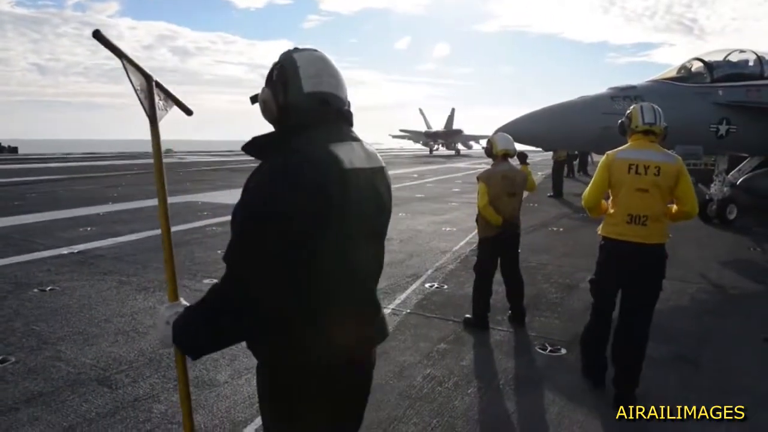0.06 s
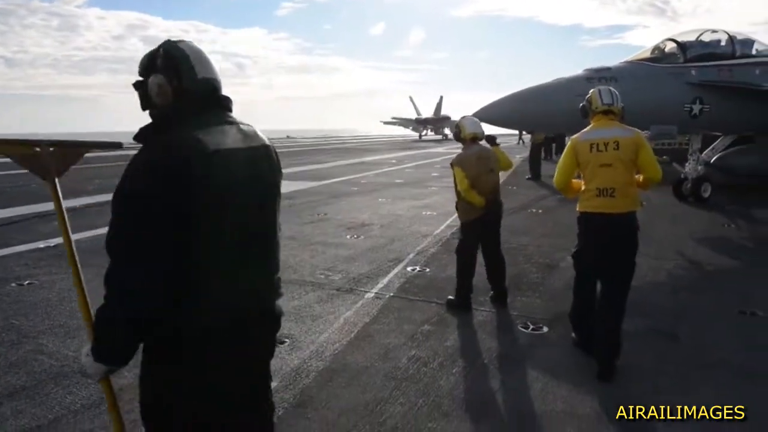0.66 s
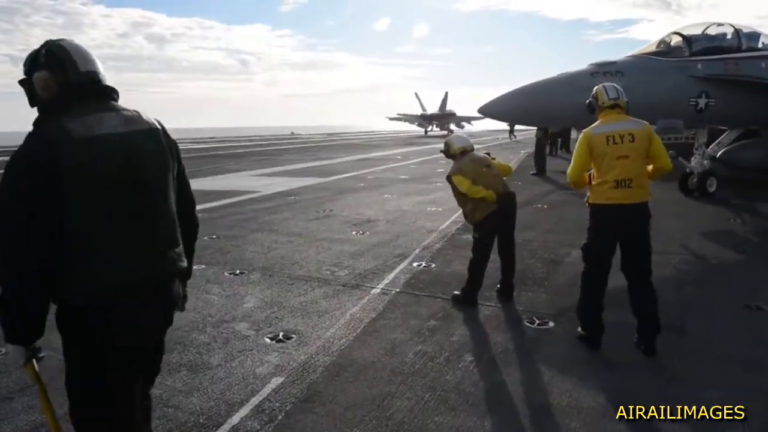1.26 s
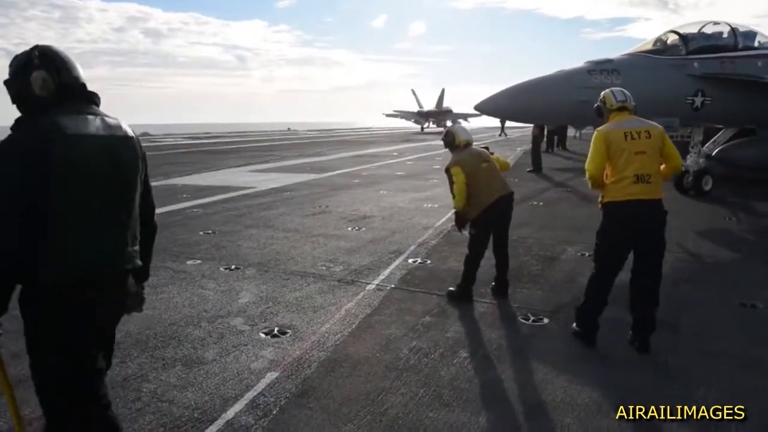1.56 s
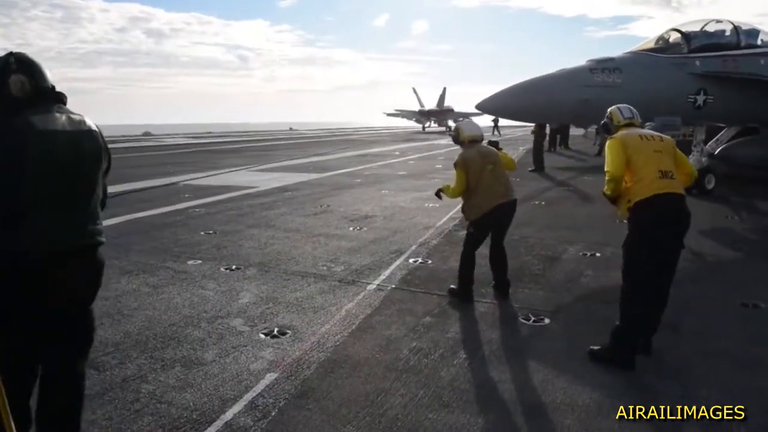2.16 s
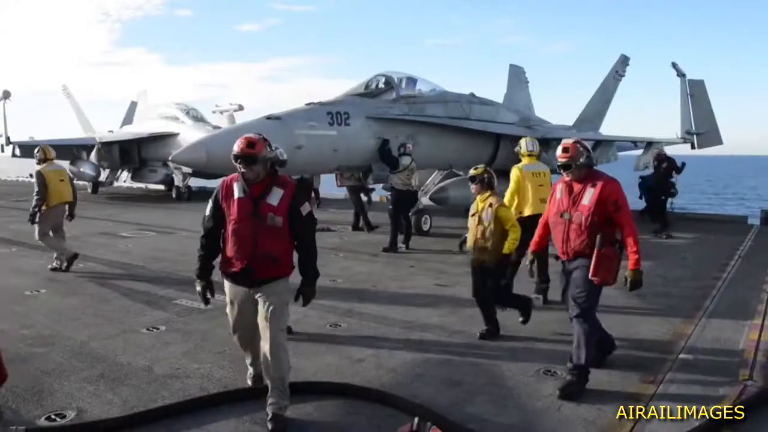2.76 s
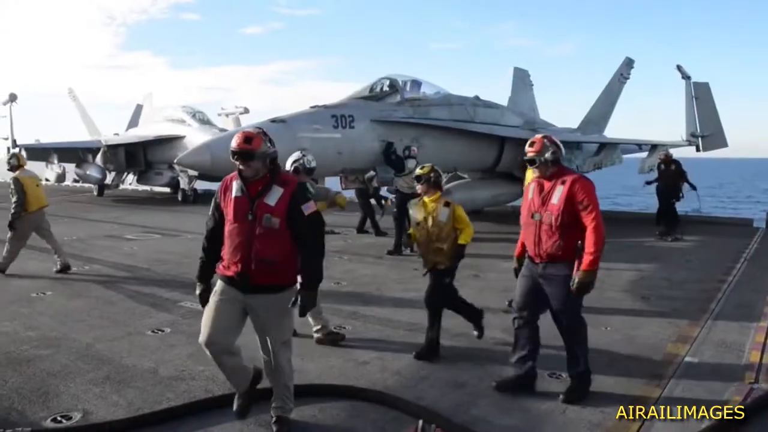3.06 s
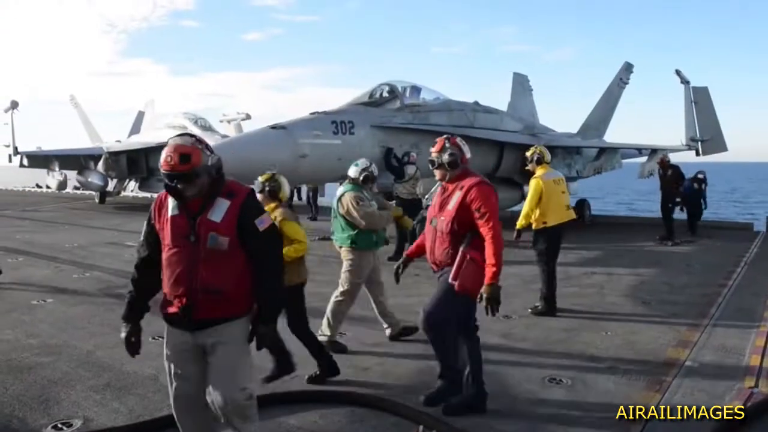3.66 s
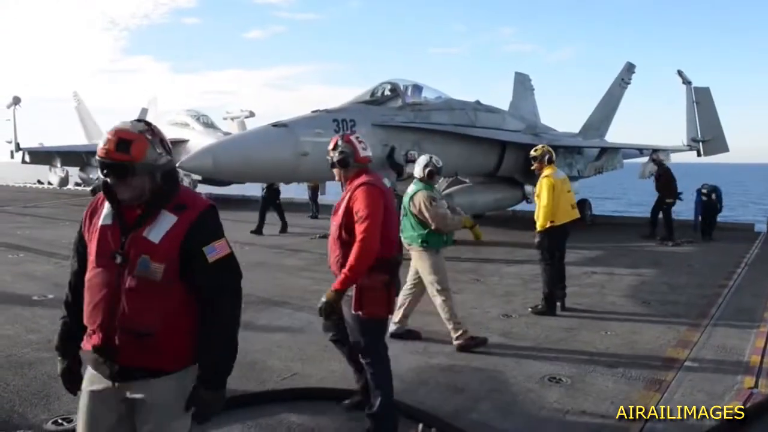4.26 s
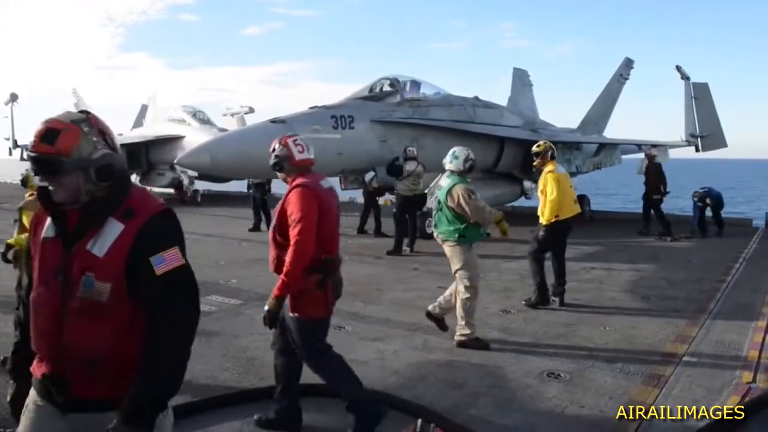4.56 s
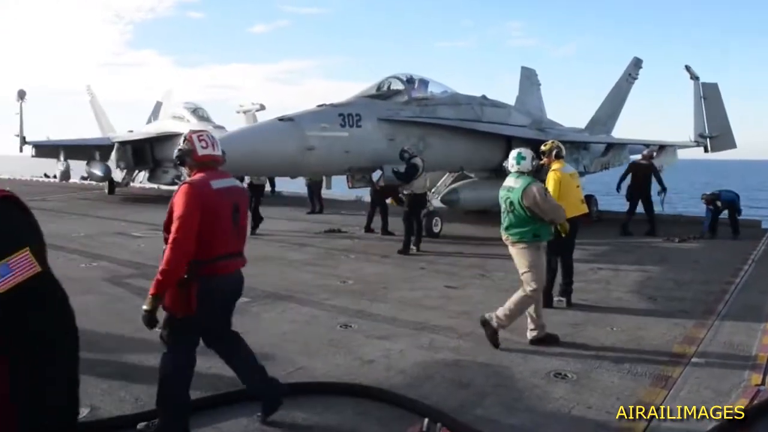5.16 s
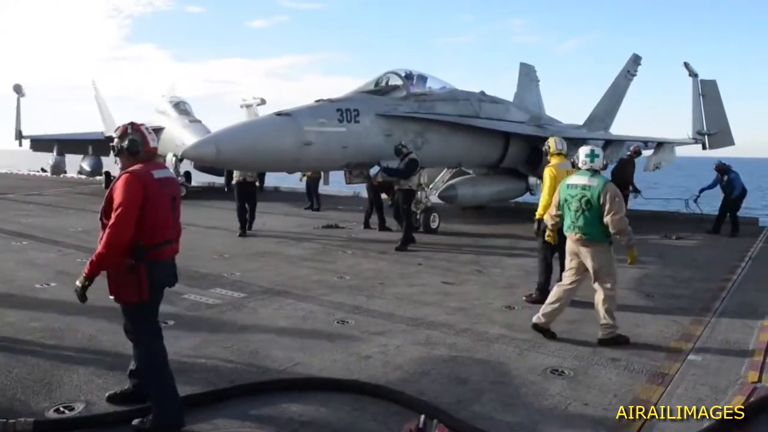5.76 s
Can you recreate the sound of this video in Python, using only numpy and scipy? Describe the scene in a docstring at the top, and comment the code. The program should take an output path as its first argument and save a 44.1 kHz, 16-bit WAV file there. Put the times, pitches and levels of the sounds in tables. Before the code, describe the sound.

A jet at full power roars on an open aircraft carrier deck, with a surging low rumble and a tearing crackle that overload the microphone. It starts to fade as the jet moves off. Then the sound switches abruptly to parked jets idling nearby, much quieter: a steady rush and airy hiss with thin, wavering high whines and a faint low drone.

```python
"""A jet at full power roars and crackles on a carrier deck, overloads the microphone, then moves off.
Swirling exhaust makes the rumble and roar; shock waves in it make the crackle.
Then the scene switches abruptly to parked jets idling nearby: spinning compressor blades whine
over the hiss of air being sucked in and a low exhaust drone."""
import sys
import numpy as np
from scipy import signal
from scipy.fft import rfft, irfft
from scipy.io import wavfile
from scipy.ndimage import uniform_filter1d

SR = 44100
rng = np.random.default_rng(int(sys.argv[2]) if len(sys.argv) > 2 else 0)


def inscribe(sig):
    """Save sig as 16-bit PCM at rate SR to the path in sys.argv[1].

    A 1-D sig is mono; a 2-D sig holds one channel per row.
    Samples are clipped to [-1, 1] before scaling.
    """
    pcm = np.round(np.clip(np.atleast_2d(sig).T, -1, 1) * 32767)
    wavfile.write(sys.argv[1], SR, pcm.astype(np.int16))


N = 261072
TIME = np.arange(N) / SR
FREQ = np.arange(N // 2 + 1) * SR / N


def undb(db):
    """Turn decibels into a gain."""
    return 10 ** (np.asarray(db) / 20)


def unit(x):
    """Scale to an average power of 1."""
    return x / np.sqrt(np.mean(x ** 2))


def steady(x, span_s):
    """Even out loudness over span_s; faster flutter stays."""
    power = uniform_filter1d(x ** 2, int(span_s * SR))
    return unit(x / np.sqrt(power + 1e-9))


def curves(table):
    """Join a table's timed points with lines, one curve per column."""
    times, *columns = np.transpose(table)
    return [np.interp(TIME, times, column) for column in columns]


def hump(peak_s, length_s):
    """A smooth rise to 1 and back, above half height for length_s."""
    return .5 ** ((2 * (TIME - peak_s) / length_s) ** 2)


def swells(table):
    """Add up humps into a level change in dB."""
    return sum(db * hump(s, length_s) for s, length_s, db in table)


def gone(lag_s=0):
    """How far the jet has moved off, from 0 towards 1."""
    leaves_s, fade_s = 2.18, .23
    return 1 - np.exp(-np.maximum(TIME - leaves_s - lag_s, 0) / fade_s)


def colour(x, outline):
    """Make each pitch louder or softer, following (pitch_hz, level_db) points."""
    hz, db = np.transpose(outline)
    return irfft(rfft(x) * undb(np.interp(np.log(FREQ + 1), np.log(hz), db)), N)


def wander(rate_hz):
    """A smooth random curve that changes about rate_hz times a second."""
    return unit(irfft(rfft(rng.standard_normal(N)) / (1 + (FREQ / rate_hz) ** 2), N))


def turbulence(outline, flicker_db, rate_hz):
    """Swirling air: noise in which each octave flickers on its own."""
    spectrum, out = rfft(colour(rng.standard_normal(N), outline)), 0
    octave = np.clip(np.log2((FREQ + 1) / 50), 0, 8)
    for k in range(9):
        band = irfft(spectrum * np.maximum(1 - np.abs(octave - k), 0), N)
        out = out + band * undb(flicker_db * wander(rate_hz))
    return unit(out)


def tone(hz, width_hz, clean=0.):
    """A tone blurred by hot air; clean is the share that stays pure."""
    scattered = (wander(width_hz / 2) + 1j * wander(width_hz / 2)) / np.sqrt(2)
    strength = np.sqrt(clean) + np.sqrt(1 - clean) * scattered
    phase = 2 * np.pi * np.cumsum(hz * np.ones(N)) / SR
    return unit(np.real(strength * np.exp(1j * phase)))


def whine(hz, width_hz, clean=0.):
    """A wavering blade tone with a breathy edge, scattered by swirling air."""
    wavering_hz = hz + 10 * wander(12.4)
    core = steady(tone(wavering_hz, width_hz, clean), span_s=.06)
    breath = tone(wavering_hz, width_hz=300) * undb(-4.5)
    return unit(core + breath) * undb(1.2 * wander(14))


def deck_echo(x):
    """The deck reflects the sound, hollowing it; the delay grows as the jet moves."""
    lag_s = (1.738 + .089 * TIME) / 1000
    return unit(x + undb(-17.5) * np.interp(TIME - lag_s, TIME, x))


def idle_exhaust(rush_db):
    """Idling exhaust rushes and wafts over a low drone and one soft thump."""
    # tone colour of the rush and the wafts: pitch_hz, level_db
    rush_colour = [(25, -34), (60, -14), (110, -11.5), (250, 0), (370, -4), (480, -2), (600, 0.5),
                   (900, 0.5), (1400, -1.5), (2000, -3), (2800, -2), (4000, -3.5), (8000, -13)]
    waft_colour = [(350, -25), (700, -7), (900, -1), (1400, -7.5), (3000, -4.5), (5000, -16)]
    # wafts of exhaust: peak_s, length_s, level_db
    wafts = [(2.884, .1, -52), (3.08, .14, -51), (3.498, .4, -45.5), (5, .42, -45), (5.29, .17, -43),
             (5.829, 0.48, -38.5)]
    # swells and dips of the drone: peak_s, length_s, change_db
    drone_swells = [(2.87, .06, 3), (4.05, .1, 4), (4.75, .15, 5.5), (5.02, .08, 7), (5.33, .1, 3.5),
                    (5.85, .3, -3)]
    rush = turbulence(rush_colour, flicker_db=1, rate_hz=26) * undb(rush_db)
    waft_gain = sum(undb(db) * hump(s, length_s) for s, length_s, db in wafts)
    waft = turbulence(waft_colour, flicker_db=2.5, rate_hz=29) * waft_gain
    drone_db = -53 + swells(drone_swells) + .63 * wander(12)
    drone = steady(tone(164, width_hz=60), span_s=.17) * undb(drone_db)
    thump = tone(90, width_hz=50) * undb(-50) * hump(2.87, length_s=.076)
    return rush + waft + drone + thump


def intake_hiss(hiss_db):
    """Air sucked into the engines hisses, with faint blade tones in it."""
    # tone colour of the hiss: pitch_hz, level_db
    hiss_colour = [(2000, -10), (4000, -4.5), (4800, -1.5), (5300, 4), (5900, 2.5), (6300, 2), (7600, 1),
                   (8700, -2), (10000, -2), (11200, 3.5), (12300, -9), (13000, -48)]
    # blade tones: pitch_hz, width_hz, above_hiss_db
    blade_tones = [(1970, 30, -19.5), (2295, 35, -22), (4380, 54, -20), (5720, 82, -14), (7560, 110, -16.5),
                   (8250, 110, -15), (11400, 300, -11.5)]
    hiss = steady(turbulence(hiss_colour, flicker_db=2, rate_hz=17), span_s=.21)
    blades = sum(tone(hz, width_hz) * undb(db) for hz, width_hz, db in blade_tones)
    return (hiss + blades) * undb(hiss_db + .5 * wander(45))


def idle_whines(hiss_db):
    """Spinning blades sing two compressor tones, a fan tone and some brief whines."""
    # lower compressor tone: time_s, pitch_hz
    lower_pitch = [(2.61, 5315), (3.1, 5330), (3.6, 5318), (4.6, 5308), (5.9, 5305)]
    # wind swells and fades it: peak_s, length_s, change_db
    lower_swells = [(2.86, .08, 4), (3.07, .15, 4), (3.5, .16, 4), (3.85, 0.18, 4), (4.11, 0.086, 8),
                    (4.37, 0.082, 8), (4.51, .08, -10), (4.63, .08, 10), (4.83, 0.072, 7), (5.05, .2, -2),
                    (5.48, .1, -3), (5.62, 0.068, 7), (5.8, .24, 6)]
    # upper compressor tone: time_s, above_hiss_db
    upper_level = [(2.61, -9), (2.69, 1.5), (2.77, -14), (2.87, 0), (2.95, -11), (3.14, -4), (3.28, -11),
                   (3.53, -5), (3.72, -9), (3.82, -5.5), (4.36, -3), (4.5, -15), (4.58, -4), (4.8, -11),
                   (5.3, -6), (5.45, -8), (5.9, -8)]
    # a fan creeping up in speed and back: time_s, pitch_hz, level_db
    fan_tone = [(2.61, 2125, -45), (2.72, 2125, -49), (2.82, 2145, -55), (3.0, 2150, -46),
                (3.25, 2170, -46), (3.36, 2170, -54), (3.47, 2194, -41), (3.57, 2180, -54),
                (3.9, 2240, -48), (4.2, 2280, -54), (4.6, 2290, -52), (4.93, 2278, -49.5),
                (5.12, 2253, -51), (5.28, 2245, -47), (5.55, 2200, -55), (5.76, 2206, -43),
                (5.9, 2180, -46)]
    # breathy whines: peak_s, length_s, pitch_hz, glide_hz_per_s, width_hz, level_db
    brief_whines = [(3, .6, 4900, 1, 90, -54), (3.197, 0.54, 2500, 0.5, 110, -52),
                    (3.35, 0.3, 4330, 0.5, 200, -48), (4.95, 0.65, 6830, -450, 220, -46),
                    (5.05, 0.53, 5710, -450, 220, -45), (5.8, .2, 4320, 1, 130, -47),
                    (5.808, .2, 5350, 1.5, 200, -44), (5.795, .25, 6480, 1, 200, -47)]
    lower_hz, = curves(lower_pitch)
    upper_db, = curves(upper_level)
    fan_hz, fan_db = curves(fan_tone)
    lower = whine(lower_hz, width_hz=56, clean=.1) * undb(-46.3 + swells(lower_swells))
    upper = whine(6040, width_hz=56, clean=.1) * undb(hiss_db + upper_db)
    fan = whine(fan_hz, width_hz=66) * undb(fan_db)
    brief = sum(tone(hz + glide * (TIME - s), width_hz) * undb(db) * hump(s, length_s)
                for s, length_s, hz, glide, width_hz, db in brief_whines)
    return lower + upper + fan + brief


def turbine_whistle():
    """The departing jet's turbine fades in, whistling at multiples of its shaft tone."""
    # whistles: shaft_multiple, width_hz, level_db
    whistles = [(5, 110, -40.5), (6, 150, -48), (7, 190, -48)]
    shaft_hz, start_s, fade_s = 983, 1.6, .4
    fade_in = np.clip((TIME - start_s) / fade_s, 0, 1)
    return fade_in * sum(tone(k * shaft_hz, width_hz) * undb(db) for k, width_hz, db in whistles)


def jet_rumble():
    """Big swirls of exhaust rumble and fade late; the lowest bass lasts longest."""
    # tone colour of three low layers: pitch_hz, level_db
    bass_colour = [(25, -9), (60, 1.5), (90, -3), (150, -25)]
    deep_colour = [(25, -34), (60, -15), (100, -3.5), (135, 1.5), (165, 2.5), (250, -31)]
    rumble_colour = [(25, -36), (60, -27), (95, -13), (140, -6), (195, 4.5), (235, 2.5), (275, 6),
                     (315, -1), (450, -10), (900, -56)]
    # surges of the rumble and of the biggest swirls: peak_s, length_s, change_db
    surges = [(.1, 0.17, 5.5), (.41, 0.04, -9), (.49, 0.07, 5.5), (.68, .25, 5), (.93, 0.074, 5),
              (1.47, .08, -1), (1.92, 0.4, 5), (2.27, 0.065, 5.5), (2.41, .09, 2)]
    deep_surges = [(.22, 0.068, 6.5), (.46, .08, 7), (.66, .08, 8), (.96, 0.093, 10.5), (1.19, 0.093, 4),
                   (1.41, .14, 9.5), (1.67, 0.064, 6), (1.95, 0.18, 4.5)]
    rumble = steady(turbulence(rumble_colour, flicker_db=1.5, rate_hz=7.5), span_s=.09)
    rumble *= undb(-22 + swells(surges) - 15 * gone(lag_s=.23))
    deep = steady(turbulence(deep_colour, flicker_db=3.5, rate_hz=14), span_s=.16)
    deep *= undb(-30.5 + swells(deep_surges))
    bass = turbulence(bass_colour, flicker_db=4, rate_hz=8) * undb(-40.5 + 1.5 * TIME)
    return bass + deep + rumble


def shocks(per_second, spread_db):
    """Shock waves of uneven size: the pressure jumps at once and relaxes slowly."""
    # tone colour of the crackle: pitch_hz, level_db
    crackle_colour = [(500, -42), (1400, -40), (2300, -4), (3500, 0.5), (5000, -1), (7000, -4.5),
                      (10000, -8.5), (15000, -8.5)]
    sizes = undb(spread_db * np.minimum(rng.exponential(size=N), 5))
    spikes = (rng.random(N) < per_second / SR) * sizes
    # delaying every pitch by a quarter cycle turns a spike into a steep jump
    jumps = irfft(-1j * rfft(spikes - spikes.mean()), N)
    return unit(colour(jumps, crackle_colour))


def jet_crackle():
    """Shocks crackle over a tearing noise; the exhaust puffs both together."""
    # tone colour of the tearing: pitch_hz, level_db
    tear_colour = [(900, -13), (1500, 1.5), (2300, 6.5), (3200, -1), (5000, -13.5)]
    # bursts and lulls: peak_s, length_s, change_db
    bursts = [(.03, .087, 0.5), (.31, 0.17, 2.5), (.72, 0.12, 0), (.87, 0.09, 3), (.97, 0.091, -3.5),
              (1.07, 0.1, 2), (1.18, .07, -1.5), (1.31, 0.068, 4), (1.68, 0.68, 3.3), (2.16, 0.11, 5)]
    shared_db = swells(bursts) + .85 * wander(4.3) - 4 * TIME
    crackle = shocks(per_second=7500, spread_db=3.5) * undb(-17.5 - 8.5 * gone())
    tearing = deck_echo(turbulence(tear_colour, flicker_db=4.5, rate_hz=110))
    tearing *= undb(-22 - 4.5 * gone())
    return (crackle + tearing) * undb(shared_db)


def jet_roar():
    """Fast exhaust roars as it mixes with the air; narrow bands swell into howls."""
    # tone colour of the roar: pitch_hz, level_db
    roar_colour = [(200, -15.5), (360, 0), (470, 1), (640, 1.5), (800, -1), (1080, -1), (1400, -4.5),
                   (1750, -7), (2400, -14.5), (5000, -49)]
    # howls: peak_s, length_s, pitch_hz, width_hz, level_db
    howls = [(0.396, 0.23, 450, 200, -23), (0.762, .35, 1674, 390, -24), (1.15, 0.49, 1083, 300, -29),
             (1.11, 0.19, 1708, 300, -27), (1.417, 0.34, 639, 190, -19.5), (1.73, .08, 1693, 300, -23),
             (2.046, 0.08, 439, 150, -20), (2.04, 0.11, 1062, 200, -20), (2.17, .15, 1162, 340, -16.5),
             (2.25, .1, 568.6, 200, -18), (2.447, 0.11, 430, 250, -27)]
    roar = deck_echo(turbulence(roar_colour, flicker_db=1.3, rate_hz=27))
    roar_db = -17 + .63 * TIME - 14.5 * gone()
    howl = sum(steady(tone(hz, width_hz), span_s=.072) * undb(db) * hump(s, length_s)
               for s, length_s, hz, width_hz, db in howls)
    return steady(roar, span_s=.071) * undb(roar_db) + howl


def scene():
    """The full-power jet, a brief dip, then the idling jets; the same in both ears."""
    # gusts that carry the hiss over: peak_s, length_s, change_db
    gusts = [(2.65, .11, 0.5), (2.87, .047, 2.5), (3.02, .1, 2.5), (3.13, 0.052, 3.5), (3.45, .062, 2.5),
             (3.79, .05, 1.5), (4.11, .09, 1.5), (4.29, .09, -2), (4.63, .1, 3.5), (4.9, 0.27, 1.3),
             (5.26, .2, 3), (5.85, .33, 3)]
    switch_s, dip_end_s = 2.592, 2.609
    gust_db = swells(gusts)
    drift_s = np.maximum(TIME - 3.2, 0)
    rush_db = -39 - .1 * drift_s + .17 * gust_db
    hiss_db = -39 + .05 * drift_s + gust_db
    idle = idle_exhaust(rush_db) + intake_hiss(hiss_db) + idle_whines(hiss_db)
    idle *= np.where(TIME < dip_end_s, undb(-11), 1)
    jet = turbine_whistle() + jet_rumble() + jet_crackle() + jet_roar()
    mix = np.where(TIME < switch_s, jet, idle)
    return np.array([mix, mix])


def record(dry):
    """The roar overloads the microphone, squashing its peaks; the highest treble falls away in steps."""
    drive_db, ceiling, top_hz = 3, .43, 15100
    squashed = ceiling * np.tanh(dry * undb(drive_db) / ceiling)
    # treble loss: pitch_hz, level_db
    treble = [(10000, 0), (10600, -9.5), (12300, -7.5), (12800, -24), (15000, -26)]
    dulled = np.array([colour(channel, treble) for channel in squashed])
    return signal.sosfilt(signal.ellip(12, .2, 80, top_hz, fs=SR, output="sos"), dulled)


dry = scene()
out = record(dry)
inscribe(out)
```